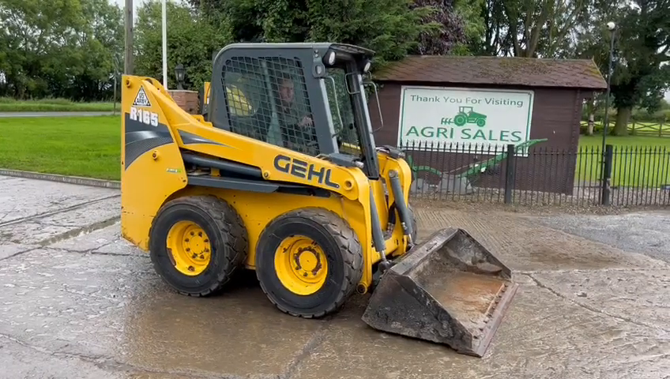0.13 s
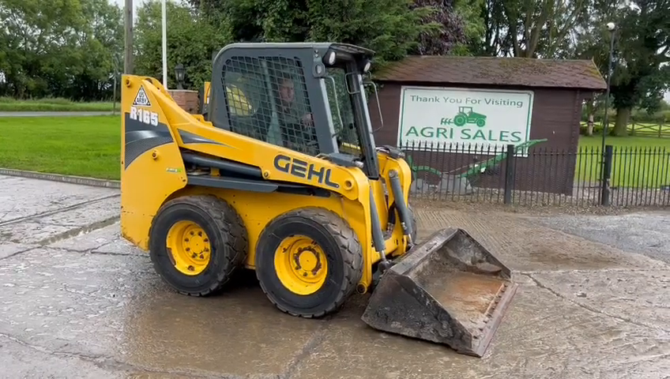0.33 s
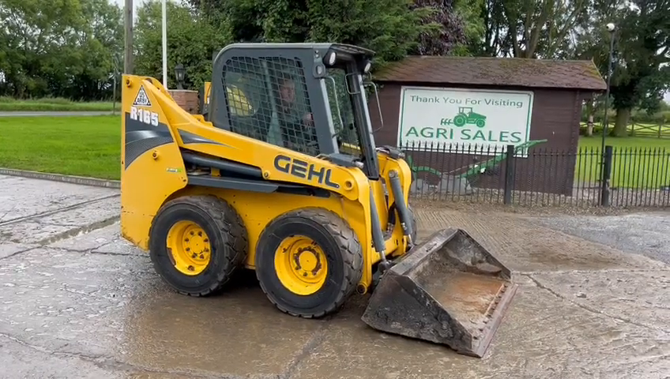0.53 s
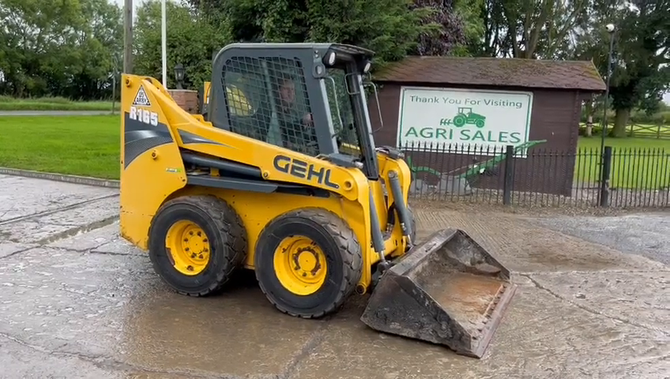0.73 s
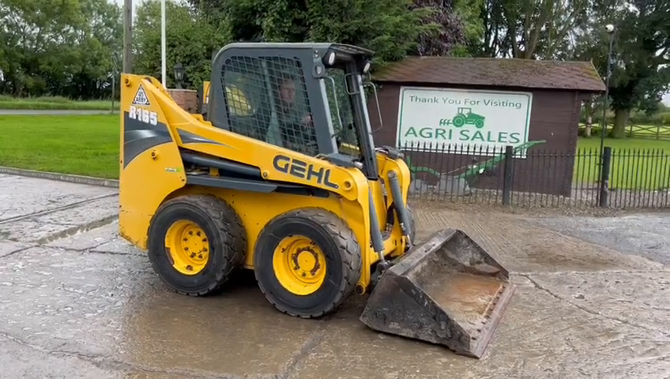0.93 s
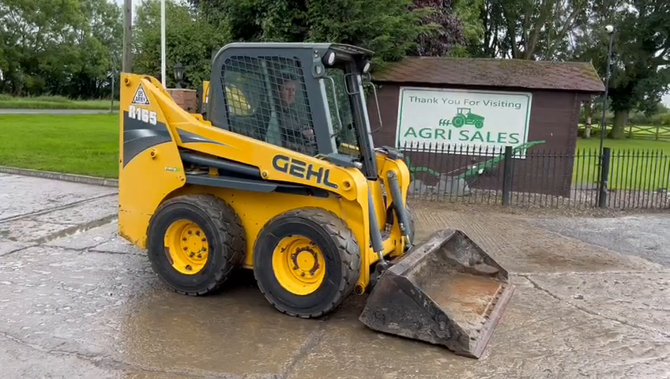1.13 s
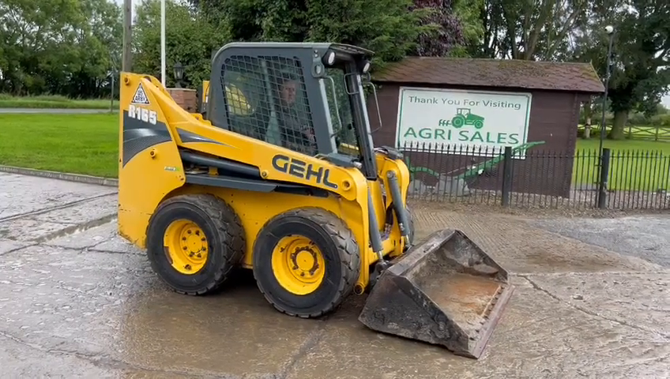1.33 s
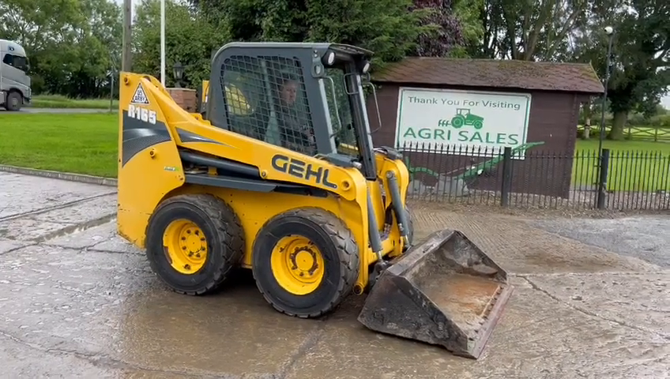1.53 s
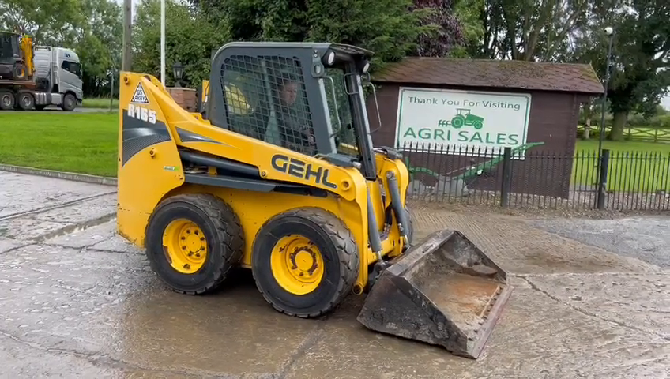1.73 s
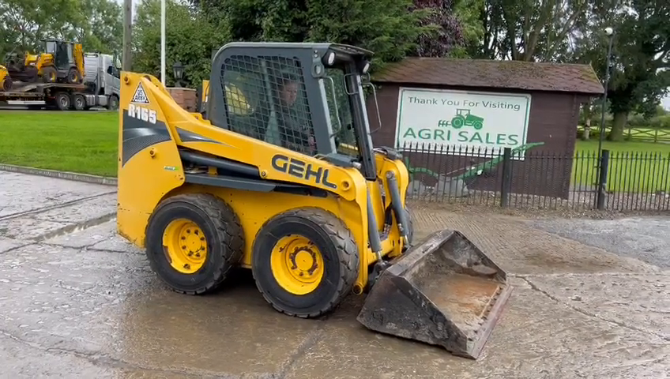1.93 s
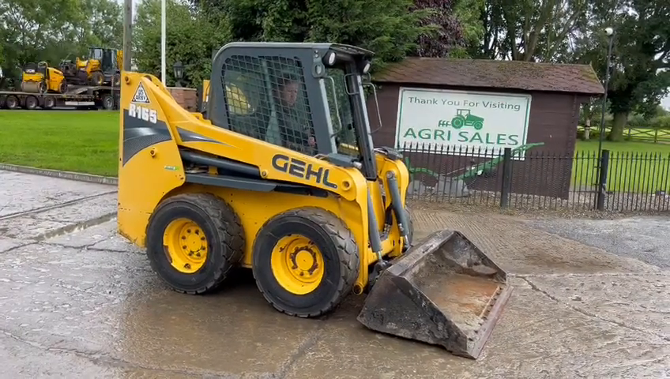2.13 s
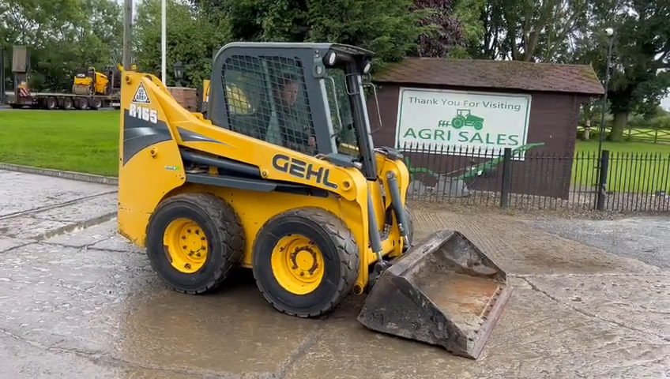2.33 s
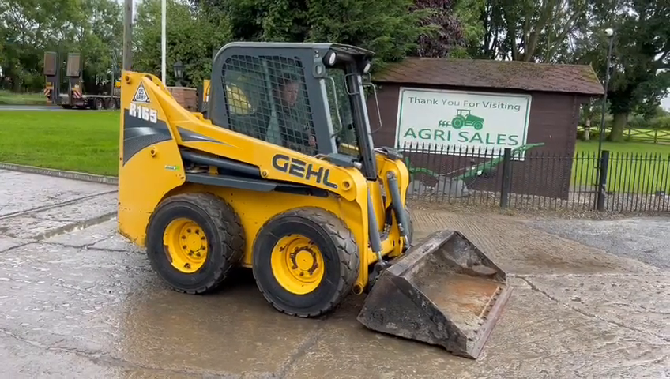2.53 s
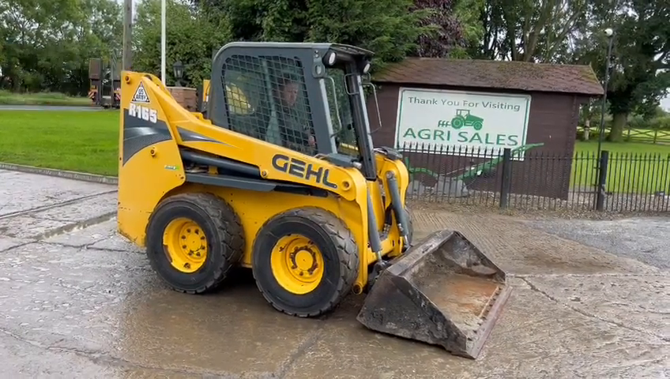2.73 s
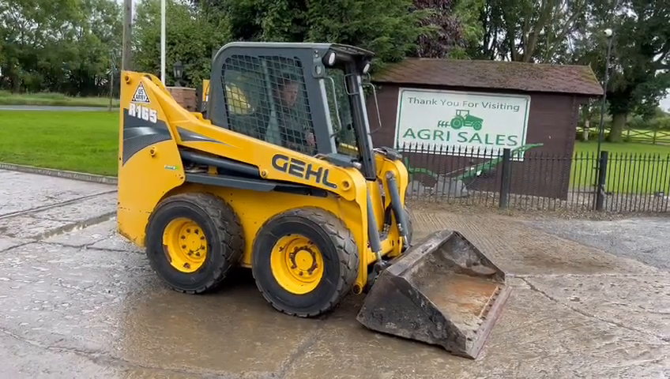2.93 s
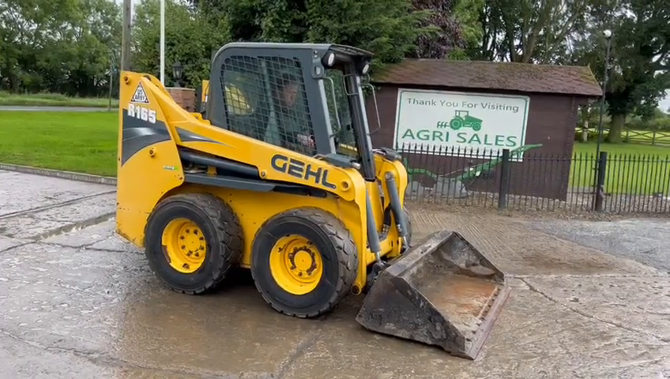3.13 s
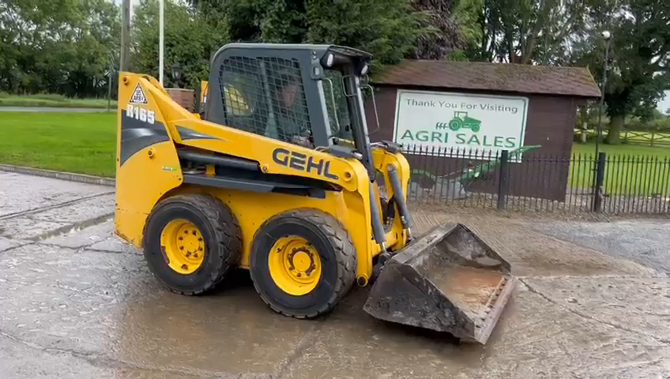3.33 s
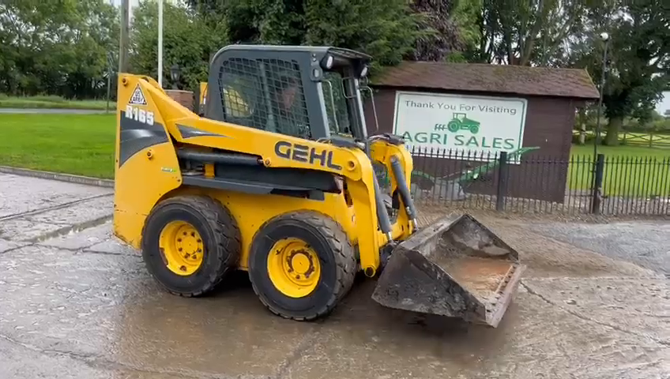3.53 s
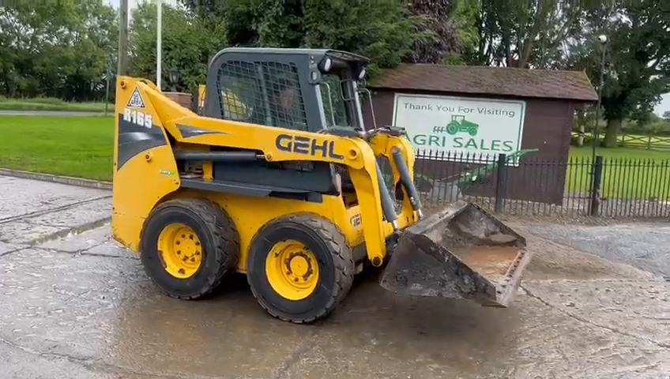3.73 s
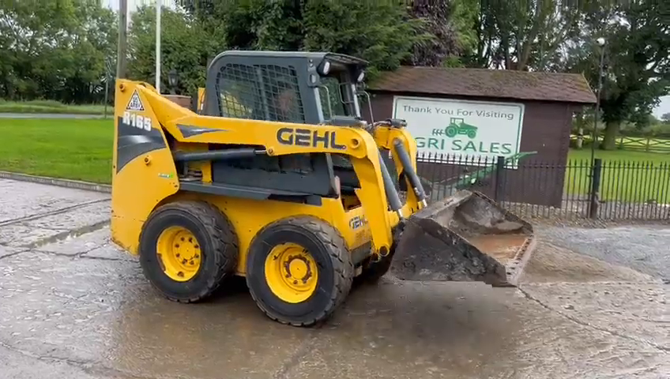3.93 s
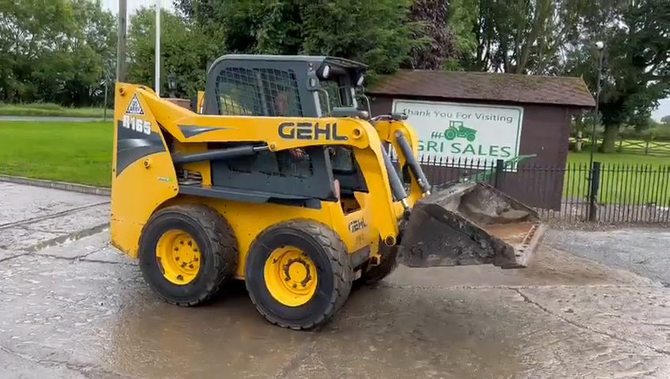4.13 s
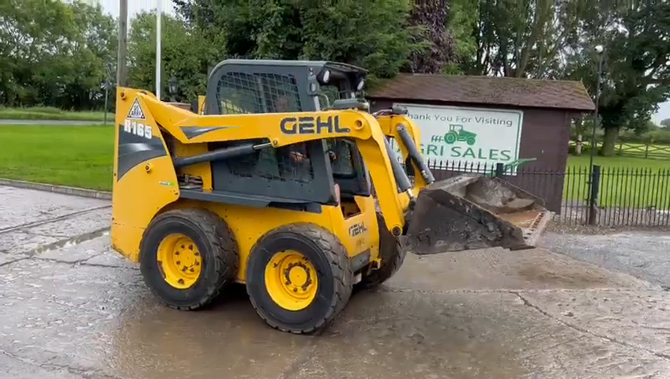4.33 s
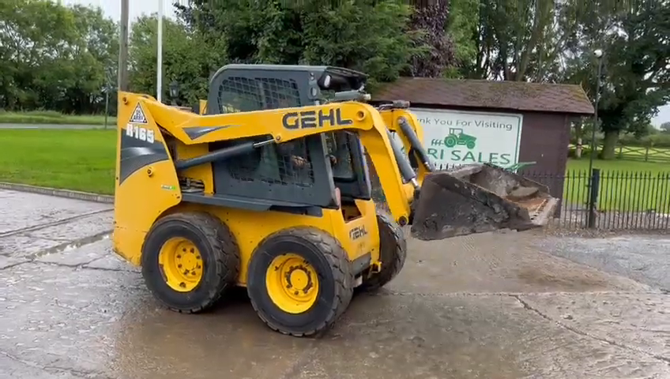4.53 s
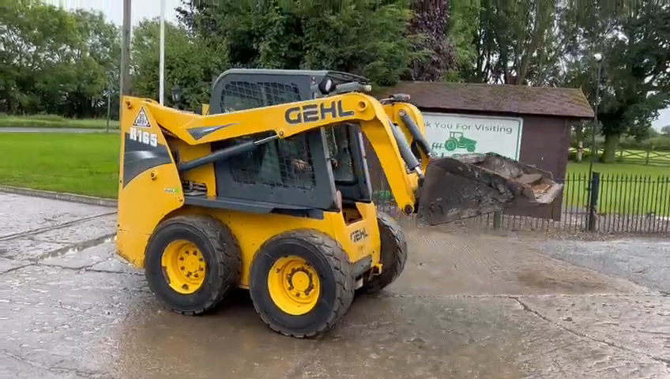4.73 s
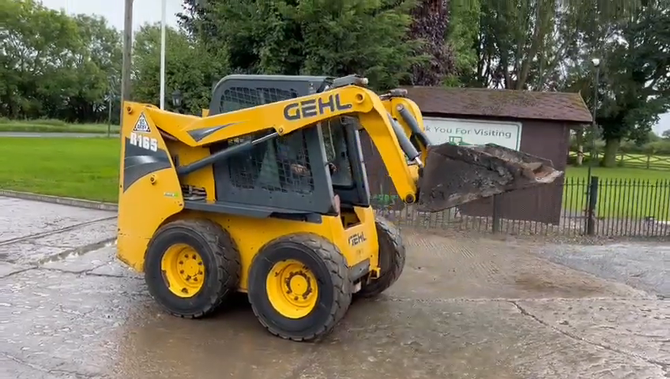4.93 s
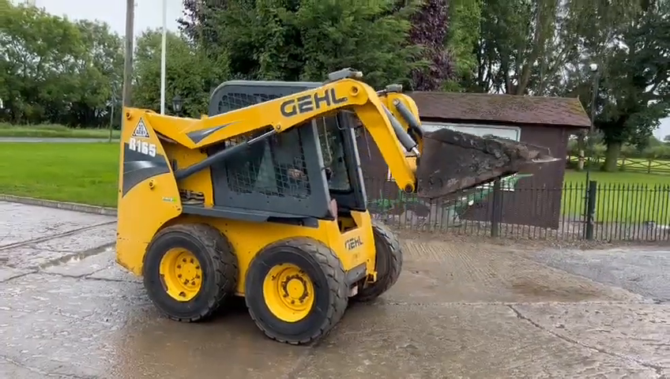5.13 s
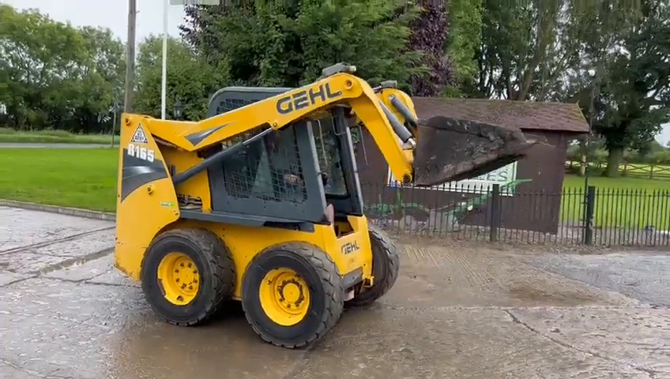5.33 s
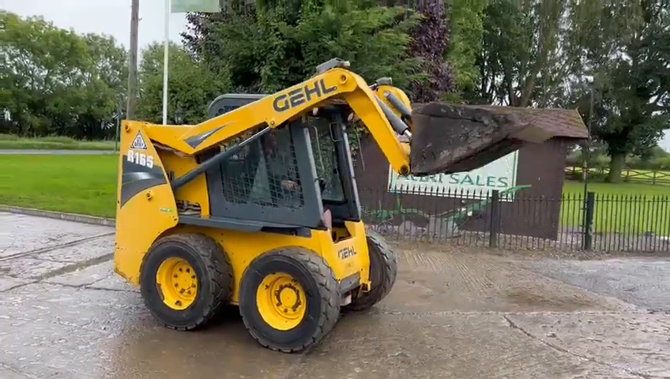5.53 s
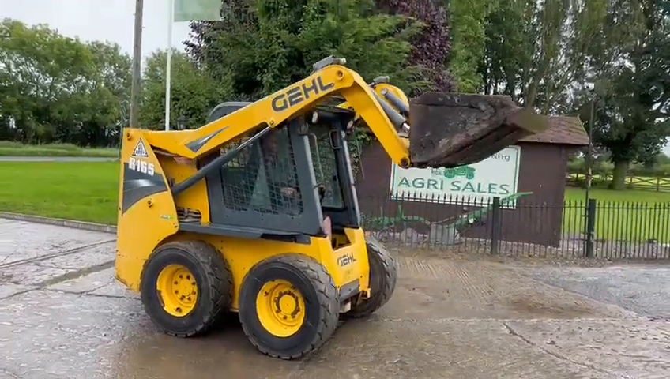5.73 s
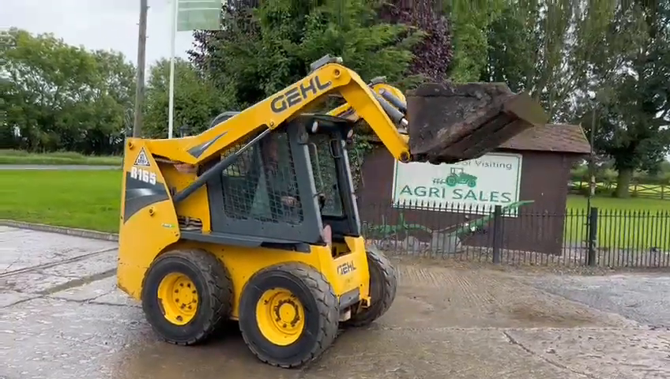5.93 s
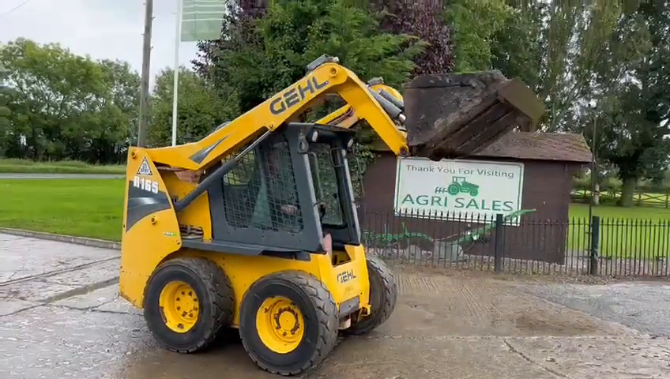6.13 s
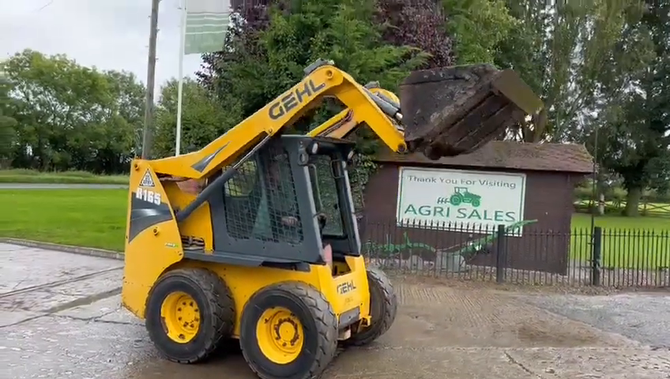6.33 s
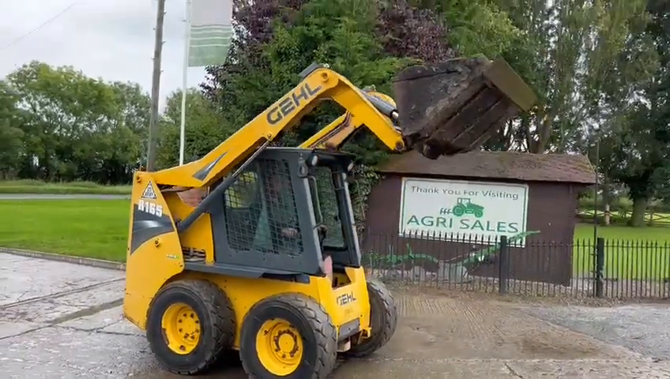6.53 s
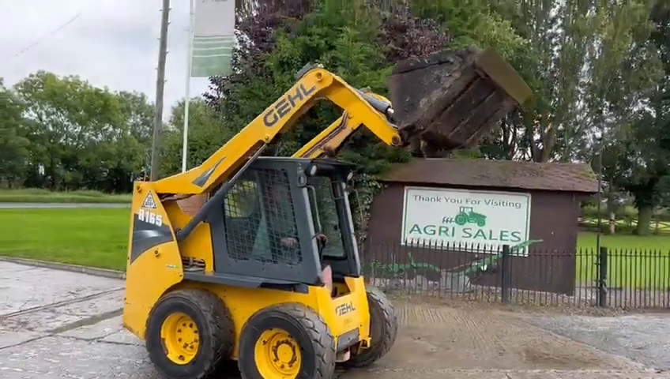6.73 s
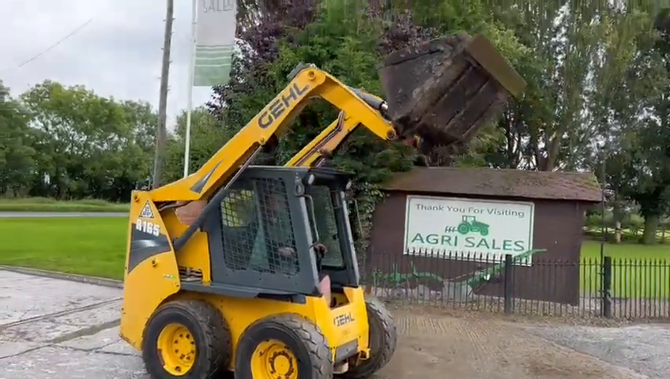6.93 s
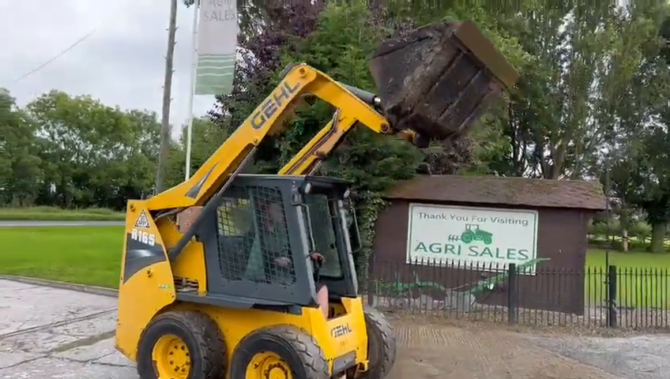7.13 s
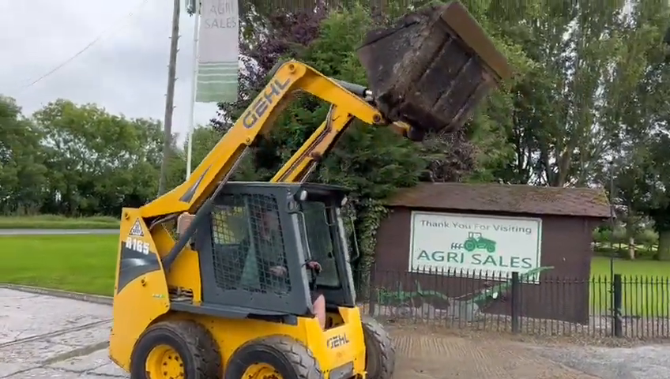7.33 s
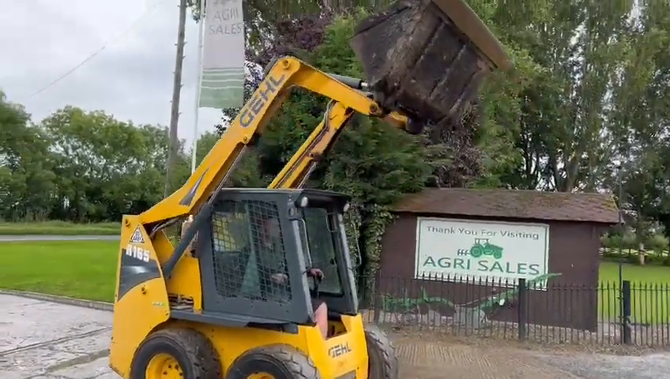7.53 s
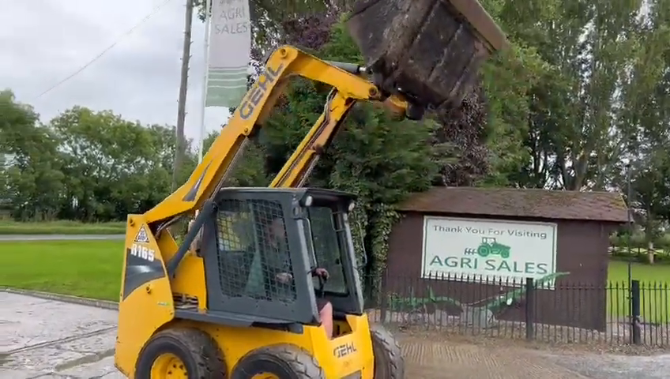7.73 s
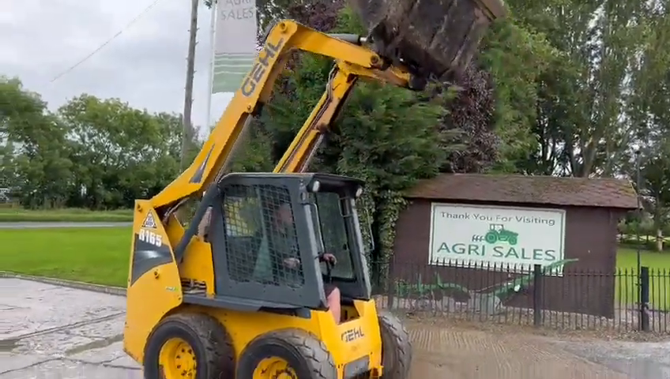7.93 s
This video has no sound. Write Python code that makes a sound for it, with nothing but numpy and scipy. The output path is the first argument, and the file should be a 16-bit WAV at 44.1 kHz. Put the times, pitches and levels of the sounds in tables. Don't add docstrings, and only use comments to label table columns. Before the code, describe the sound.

A diesel loader idles with clatter and whine as a lorry passes, revs up in two steps, then a bucket knocks and lifts.

```python
import sys
import numpy as np
from scipy import signal
from scipy.fft import rfft, irfft, next_fast_len
from scipy.io import wavfile
from scipy.ndimage import uniform_filter1d

SR = 44100
rng = np.random.default_rng(int(sys.argv[2]) if len(sys.argv) > 2 else 0)


def volts_from_db(level):
    exponent = np.asarray(level, float) / 20
    return 10 ** exponent


def store_wav(level_fs):
    pcm = np.round(np.clip(np.atleast_2d(level_fs), -1, 1) * 32767)
    wavfile.write(sys.argv[1], SR, pcm.T.astype(np.int16))


N = 356328
SIZE = next_fast_len(N)
HZ = np.maximum(np.arange(SIZE // 2 + 1) * SR / SIZE, 1)

# time in seconds, firings per second.
CRANK_SPEED = [(0, 33.25), (1.86, 33.25), (1.92, 37), (2.0, 45), (2.07, 47.4), (2.11, 50.9), (2.18, 57.9),
               (2.3, 58), (2.75, 57.1), (2.8, 60.7), (2.88, 66.5), (2.96, 66.3), (3.05, 65.6), (3.2, 65.35),
               (3.6, 65.3), (8.08, 65.26)]
SPEED_STAGES = [33.3, 57.5, 65.3]
# firings per second, levels of the 1st, 2nd and 3rd order in dB.
EXHAUST_RESPONSE = [(33.6, -50.5, -32.5, -44), (38, -47, -41, -40), (45, -29, -37.5, -23.5),
                    (44.6, -20.5, -17, -45), (50, -26.5, -36, -39), (56.3, -18, -45.5, -33.5),
                    (60.5, -16, -21, -32.5), (60.5, -16.5, -31, -43)]
# multiple of firing, dB at idle, dB at working speed.
SIDE_ORDERS = [(1.5, -42.5, -51), (2.5, -57, -40.5), (4, -49, -47), (5, -38, -49.5), (7, -65, -48.5),
               (7.5, -75, -46.5), (8, -53, -46), (9, -55, -50.5), (10.5, -53, -45), (11, -66, -50)]
# time in seconds, depth in dB, half length in seconds.
FALTERS = [
    (3.64, 2, 0.061),
    (4.4, 2, 0.065),
    (5.09, 5, .05),
    (5.893, 19, 0.027),
    (6.27, 4, .06),
]
PUMP_ORDERS = [6, 10, 12, 18]
# idle, first step, working unloaded, working at full pressure, all in dB.
PUMP_LEVELS = [(-31.5, -31.5, -33, -74), (-39.5, -52, -34.5, -28), (-84, -41.5, -35.5, -31.5),
               (-62, -47.5, -49, -40.5)]
PUMP_SIGNS = [1, 1, -1, 1]
# time in seconds, share of full pressure 0-1.
OIL_PRESSURE = [(3.5, 0), (4.0, 0), (4.6, 0.23), (5.2, 0.63), (5.6, 0.72), (6.1, 0.72), (7.0, 0.74),
                (7.5, 0.75), (8.08, 0.77)]
CYLINDER_DB = [1, -3, 3.5, 3]
# idle, first step, working speed in dB, gain under load in dB.
RUMBLE_DB = (-30, -30, -28.5, -0.55)
CLATTER_DB = (-41.5, -40, -37, 1.5)
TICK_DB = (-48, -46, -48.5, 0)
# frequency in Hz, density in dB per Hz.
RUMBLE_SPECTRUM = [(25, -16.5), (60, -5), (110, 4.5), (170, -1), (260, -6), (450, -8.5), (650, -8.5),
                   (900, -17), (1300, -51)]
CLATTER_SPECTRUM = [(500, -21.5), (900, 0.5), (1120, 0), (1500, 0.5), (1900, -0.5), (2300, -4), (2800, -4),
                    (3300, -6), (4200, -14.5), (6000, -24)]
TICK_SPECTRUM = [(2500, -4.5), (4200, 0.5), (5500, 6), (6900, 2), (7300, -0.5), (8000, 8.5), (8600, 0.5),
                 (9200, -44), (10500, -63), (11400, -56), (13000, -40)]
# frequency in Hz, width in Hz, dB over the clatter.
PANELS = [(1095, 50, 3), (1377, 25, 0), (1565, 14, 1), (1832, 35, 3), (1908, 35, 2), (2253, 40, 4),
          (2505, 35, 2), (1700, 20, -1)]
# time in seconds, level in dB, brightness in dB per octave.
KNOCKS = [
    (3.290, -19, 13),
    (3.2964, -5, 0),
    (3.303, -15, -5),
    (3.314, -15, -2.0),
    (3.326, -23, 9.5),
    (3.350, -22, -10.5),
    (3.365, -27, -7),
]
# frequency in Hz, level in dB, decay by 60 dB in seconds.
BUCKET_MODES = [(215, -16.5, .14), (279.5, -4, 0.16), (345, -5.5, 0.058), (443, -21, 0.069),
                (463, -7.5, 0.13), (527, -7, 0.066), (647, -15, 0.081), (740, -15.5, 0.11),
                (810, -13.5, 0.059), (977, -12, 0.056), (1053, -12.5, 0.061), (1173, -18, .08),
                (1290, -25, 0.072), (1427, -29, 0.092), (1900, -28, 0.035)]
# middle abreast in seconds, half its passing time in seconds, level abreast in dB,
# hidden by the shed from this second, then loss in dB per second.
LORRY_PASS = [
    (1.1, 0.68, -28.5, 2.9, 27),
    (1.75, 0.71, -36, 2.6, 15),
]
# frequency in Hz, density in dB per Hz.
ROAR_SPECTRUM = [(120, -16.5), (260, 1), (340, 4.5), (450, -4), (650, 0.5), (900, -4), (1150, 5),
                 (1500, -7), (2100, -8.5), (3000, -42.5)]
SPRAY_SPECTRUM = [(1200, -15), (2300, 4), (3200, 1), (4200, 1), (5500, 3), (6900, -2.5), (8000, -7),
                  (9000, -14.5), (9800, -50)]
# frequency in Hz, width in Hz, dB over the roar.
LORRY_HUMS = [(288, 46, 1), (320, 25, -10.5), (567, 23, 6.5), (650, 35, 8.5), (746, 35, 0.5),
              (867, 26, 4.5), (1158, 16, -14)]
# frequency in Hz, likeness 0-1, left lead in radians, left over right in dB.
LOADER_PATH = [(600, .93, .75, 0.0), (1100, .65, 1.1, 3.4), (1750, .35, 2.2, 1.0), (2300, .6, 6.2, -.2),
               (4300, .4, 7.5, 2.6), (5600, .2, 5.4, 7.0), (6900, .8, 6.3, .6), (8100, .75, 4.9, -.3)]
LORRY_PATH = [(260, .95, -.55, .5), (700, .85, -.7, 2.2), (1400, .7, -.8, -.9), (2350, .82, -.4, -1.2),
              (3400, .7, 0, 1.0), (4100, .75, 1.0, 1.3), (5600, .5, .2, 2.5), (6700, .7, .1, -.5)]

CAM_THROB_DB = 1.5


def loader():
    firing_hz, = in_time(CRANK_SPEED)
    cycles = np.cumsum(firing_hz) / SR
    rumble_db, clatter_db, tick_db = [
        np.interp(firing_hz, SPEED_STAGES, row[:3]) + row[3] * engine_load() + surge_db(firing_hz)
        for row in (RUMBLE_DB, CLATTER_DB, TICK_DB)]
    throb_db = CAM_THROB_DB * np.cos(np.pi * cycles / 2 + 1.2)
    rumble_gain = volts_from_db(rumble_db + 0.97 * drift(3.3) + throb_db)
    body = rumble_gain * colour(rng.standard_normal((2, N)), RUMBLE_SPECTRUM)
    body += volts_from_db(clatter_db) * clatter(cycles + 0.1517)
    tick = pulsing_noise(cycles + 0.05, strength=0.7, depth=0.47)
    body += volts_from_db(tick_db) * colour(tick, TICK_SPECTRUM)
    direct = exhaust_tones(cycles, firing_hz) + pump_whine(cycles, firing_hz) + body[0] + bucket()
    return at_microphones(direct, body[1], LOADER_PATH, focus=1.0)


def exhaust_tones(cycles, firing_hz):
    turn = 2 * np.pi * cycles
    first, second, third = map(volts_from_db, exhaust_db(firing_hz))
    out = first * volts_from_db(0.5 * drift(8.5)) * np.cos(turn)
    out -= second * volts_from_db(1.07 * drift(5.8)) * np.cos(2 * turn + 0.9)
    out += third * np.cos(3 * turn)
    speed = np.clip((firing_hz - 36) / 22, 0, 1)
    for multiple, idle_db, working_db in SIDE_ORDERS:
        level_db = idle_db + speed * (working_db - idle_db) + 2.47 * drift(4.4)
        out += volts_from_db(level_db) * np.cos(np.round(2 * multiple) / 2 * turn)
    return np.sqrt(2) * out


def exhaust_db(firing_hz):
    speeds, *orders = np.transpose(EXHAUST_RESPONSE)
    first, second, third = [np.interp(firing_hz, speeds, c) + surge_db(firing_hz) for c in orders]
    t = np.arange(N) / SR
    falter_db = sum(db * np.exp(-((t - s) / half) ** 2) for s, db, half in FALTERS)
    return first, second + 5 * engine_load() - falter_db, third - 6.5 * engine_load()


def pump_whine(cycles, firing_hz):
    turn = 2 * np.pi * cycles
    gains = pump_gains(firing_hz)
    out = np.zeros(N)
    for multiple, gain in zip(PUMP_ORDERS, gains):
        waver = volts_from_db(0.93 * drift(2.7) + CAM_THROB_DB * np.cos(turn / 4 + 3.3))
        out += gain * waver * np.cos(multiple * turn + 0.34 * drift(5.0))
    working = np.interp(firing_hz, SPEED_STAGES, [0, 0, 1])
    out += working * gains[0] * volts_from_db(-5) * (1 - engine_load()) * np.cos(7 * turn)
    return np.sqrt(2) * out


def pump_gains(firing_hz):
    pressure = np.clip(in_time(OIL_PRESSURE)[0], 0, 1) * engine_load()
    slack_db = 5.5 * surge_db(firing_hz, lag_s=0.14)
    gains = []
    for row, sign in zip(PUMP_LEVELS, PUMP_SIGNS):
        unloaded = volts_from_db(np.interp(firing_hz, SPEED_STAGES, row[:3]) - slack_db)
        gains.append((1 - pressure) * unloaded + sign * pressure * volts_from_db(row[3]))
    return gains


def clatter(cycles):
    firing = cycles.astype(int)
    strength = volts_from_db(np.array(CYLINDER_DB)[firing % 4] + 2.9 * rng.standard_normal(N)[firing])
    knocks = rms_one(np.diff(firing, prepend=firing[0]) * strength)
    bursts = pulsing_noise(cycles, strength, depth=0.28, repeat=0.4)
    block = colour(bursts + volts_from_db(-13.5) * knocks * [[1], [0]], CLATTER_SPECTRUM)
    return sing(block, PANELS, rate=0.27)


def pulsing_noise(cycles, strength, depth, repeat=0):
    burst = 1 - depth + depth * 1.43 * strength * np.exp(-2.2 * (cycles % 1))
    points = 2700
    step = cycles / 4 % 1 * points
    contacts = rng.standard_normal((4, points + 1))
    looped = rms_one(np.array([np.interp(step, np.arange(points + 1), c) for c in contacts]))
    wear = 0.7 * drift(0.4)
    looped = np.cos(wear) * looped[:2] + np.sin(wear) * looped[2:]
    noise = np.sqrt(1 - repeat) * rng.standard_normal((2, N)) + np.sqrt(repeat) * looped
    return rms_one(noise * uniform_filter1d(burst, size=60))


def engine_load():
    lift_s, rise_s = 3.22, 0.43
    return 1 - np.exp(-np.maximum(np.arange(N) / SR - lift_s, 0) / rise_s)


def surge_db(firing_hz, lag_s=0.014):
    r = np.exp(-1 / (lag_s * SR))
    climb = np.maximum(np.gradient(firing_hz) * SR, 0) / 100
    return 1.5 * signal.lfilter([1 - r], [1, -r], climb)


def bucket():
    s, blow_db, bright_db = np.transpose(KNOCKS)
    spots = np.cos(2 * np.pi * rng.random((len(s), len(BUCKET_MODES))))
    starts = np.round(s * SR).astype(int)
    out = np.zeros(N)
    for (hz, level_db, t60), spot in zip(BUCKET_MODES, spots.T):
        clicks = np.full(N, 1e-18)
        hit_db = blow_db + level_db + bright_db * np.log2(hz / 500) + 1.3 * np.abs(spot)
        clicks[starts] = np.sign(spot) * volts_from_db(hit_db)
        r, w = volts_from_db(-60 / (t60 * SR)), 2 * np.pi * hz / SR
        out += signal.lfilter([0, np.sin(w)], [1, -2 * r * np.cos(w), r * r], clicks)
    return signal.sosfilt(signal.butter(2, 2200, fs=SR, output="sos"), out)


def lorry():
    t = np.arange(N) / SR
    roar_db, spray_db = [
        db - 10 * np.log10(1 + ((t - s) / span) ** 4) - fade_db * np.maximum(t - hidden, 0)
        for s, span, db, hidden, fade_db in LORRY_PASS]
    tyres = sing(colour(rng.standard_normal((2, N)), ROAR_SPECTRUM), LORRY_HUMS, rate=2.2)
    roar = volts_from_db(roar_db + 0.57 * drift(14)) * tyres
    spray = volts_from_db(spray_db + 1.4 * drift(20)) * colour(rng.standard_normal((2, N)), SPRAY_SPECTRUM)
    direct, scattered = roar + spray
    return at_microphones(direct, scattered, LORRY_PATH, focus=0.4, lag_s=0.00045)


def sing(x, resonances, rate):
    out = x.copy()
    for hz, width, over_db in resonances:
        r = np.exp(-np.pi * width / SR)
        poles = [1, -2 * r * np.cos(2 * np.pi * hz / SR), r * r]
        rung = signal.lfilter([(1 - r * r) / 2, 0, (r * r - 1) / 2], poles, x)
        out += volts_from_db(over_db + 2.4 * drift(rate)) * rung
    return out


def at_microphones(direct, scattered, path, focus, lag_s=0):
    alike, lead, balance_db = in_hz([(162, 1, 0.009, 0.042)] + path)
    alike = np.clip(alike, 0, 1) ** focus
    left = rfft(direct, SIZE)
    delayed = left * np.exp(-1j * (lead + 2 * np.pi * HZ * lag_s))
    right = alike * delayed + np.sqrt(1 - alike ** 2) * rfft(scattered, SIZE)
    return irfft([left * volts_from_db(balance_db / 2), right * volts_from_db(-balance_db / 2)], SIZE)[:, :N]


def colour(x, spectrum):
    return rms_one(irfft(rfft(x, SIZE) * volts_from_db(in_hz(spectrum)[0]), SIZE)[..., :N])


def drift(rate):
    r = np.exp(-80 * np.pi * rate / SR)
    slow = signal.lfilter([1], [1, -2 * r, r * r], rng.standard_normal(N // 40 + 2002))[2000:]
    return np.interp(np.arange(N) / 40, np.arange(len(slow)), rms_one(slow - slow.mean()))


def rms_one(x):
    return x / np.sqrt(np.mean(x ** 2) + 1e-20)


def in_time(rows):
    s, *columns = np.transpose(rows)
    return [np.interp(np.arange(N) / SR, s, c) for c in columns]


def in_hz(rows):
    hz, *columns = np.transpose(rows)
    return [np.interp(np.log(HZ), np.log(hz), c) for c in columns]


def scene():
    return loader() + lorry()


def low_pass(x):
    return signal.sosfilt(signal.butter(12, 11750, fs=SR, output="sos"), x)


def record(dry):
    rounded = dry / (1 + (dry / 0.8) ** 6) ** (1 / 6)
    return low_pass(rounded)


dry = scene()
out = record(dry)
store_wav(out)
```